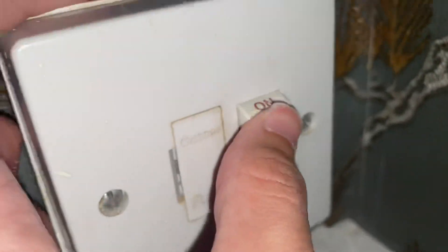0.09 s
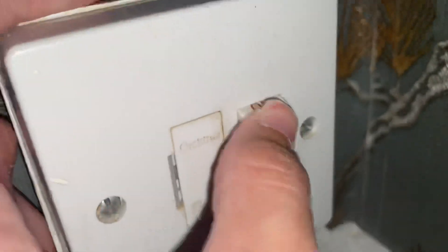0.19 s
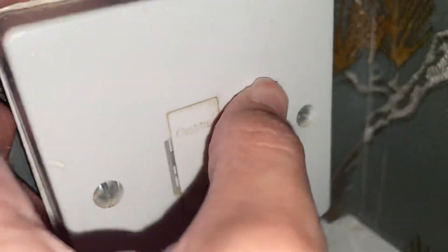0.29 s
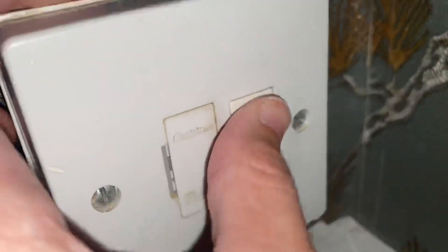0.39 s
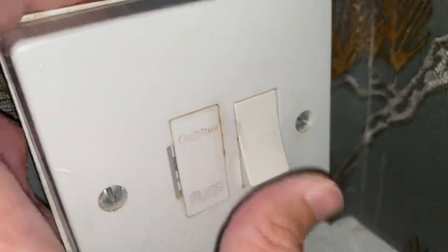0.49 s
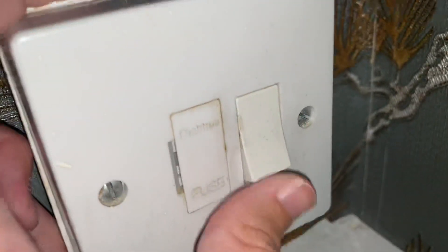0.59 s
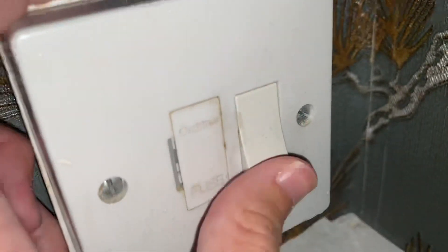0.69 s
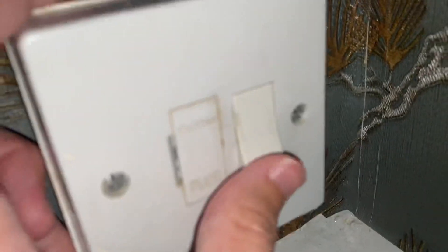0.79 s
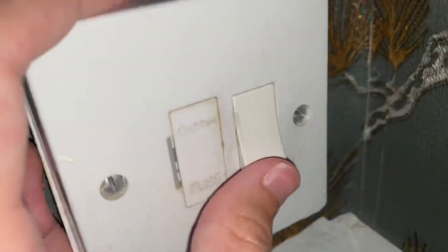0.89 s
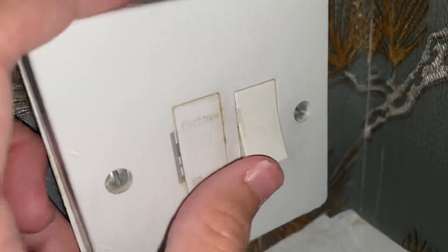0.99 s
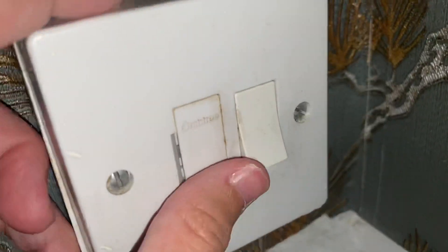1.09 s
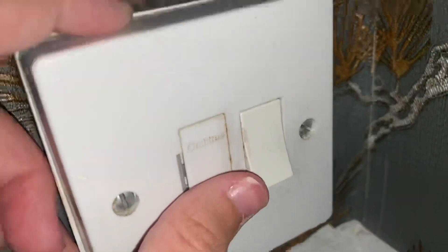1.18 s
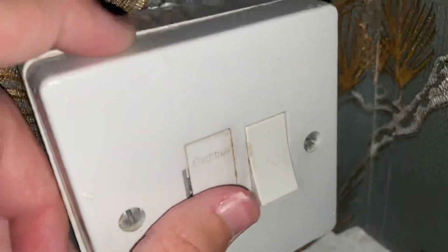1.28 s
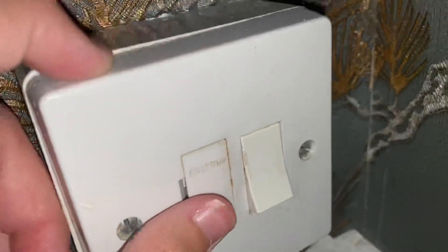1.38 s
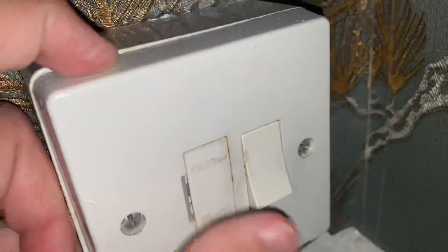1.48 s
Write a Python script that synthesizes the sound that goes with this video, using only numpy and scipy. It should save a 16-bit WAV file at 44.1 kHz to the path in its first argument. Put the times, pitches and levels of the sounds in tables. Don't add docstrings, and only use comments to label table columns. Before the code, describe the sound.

A plastic wall switch is flicked once very close up: a small slip, then a bright hard snap with a hollow knock and brief small-room echo, followed by quiet skin rubbing and soft fingertip taps.

```python
import sys
import numpy as np
from scipy import signal
from scipy.fft import rfft, irfft, next_fast_len
from scipy.io import wavfile
from scipy.ndimage import uniform_filter1d, map_coordinates

SR = 44100
rng = np.random.default_rng(int(sys.argv[2]) if len(sys.argv) > 2 else 0)


def magnitude_from_level(level_db):
    exponent = np.asarray(level_db, float) / 20
    return 10 ** exponent


def dump(signal):
    limited = np.clip(np.atleast_2d(signal).T, -1, 1)
    pcm = np.round(limited * 32767).astype(np.int16)
    wavfile.write(sys.argv[1], SR, pcm)


N = 68355


def unit(x):
    return x / np.sqrt(np.mean(x ** 2) + 1e-20)


def along(points, hz):
    f, v = np.transpose(points)
    return np.interp(np.log(hz + 1), np.log(f + 1), v)


def curve(rows):
    return np.interp(np.arange(N) / SR, *np.transpose(rows))


def wobble(rate):
    return map_coordinates(rng.standard_normal(N // 64), [np.arange(N) * rate / SR])


def filtered(x, response):
    n = x.shape[-1]
    size = next_fast_len(n + 4096)
    return irfft(rfft(x, size) * response(np.fft.rfftfreq(size, 1 / SR)), size)[..., :n]


def rush(source, spectrum):
    # f/Hz, likeness (1 = the same)
    alike = [(60, .85), (130, .85), (290, 0.37), (640, 0.085), (3300, .3), (4100, 0.3), (4900, .2)]

    def response(hz):
        turn = np.arccos(np.clip(along(alike, hz), -1, 1)) / 2
        return magnitude_from_level(along(spectrum, hz)) * [np.cos(turn), np.sin(turn)]

    mid, side = filtered(source, response)
    return unit(np.array([mid + side, mid - side]))


def patchy():
    z = signal.stft(rng.standard_normal((2, N)), nperseg=512)[2]
    field = uniform_filter1d(rng.standard_normal(z.shape[1:]), size=4, axis=0)
    field = uniform_filter1d(field, size=9, axis=1)
    patch_db = 2.5
    return signal.istft(z * magnitude_from_level(patch_db * unit(field)), nperseg=512)[1][:, :N]


def background():
    # f/Hz, level/dB
    air_colour = [(20, -19), (110, -2), (400, -18), (800, -22), (1100, -18), (2300, -25), (3200, -32),
                  (16000, -71)]
    # f/Hz, level/dB, wobble rate/(1/s)
    overtones = [(297.4, -75.5, 24)]
    # t/s, level/dB
    handling = [
        (0, -54),
        (.1, -73),
        (.55, -77),
        (.7, -56),
        (.78, -55.5),
        (.9, -58.5),
        (.98, -60.5),
        (1.08, -81),
        (1.55, -67),
    ]
    # f/Hz, level/dB
    thump_colour = [(15, -29), (35, -12), (60, 6.5), (85, -1.5), (140, -51.5)]
    t = np.arange(N) / SR
    air_db = -63
    air = magnitude_from_level(air_db) * rush(patchy(), air_colour)
    hum = 0
    for hz, db, rate in overtones:
        level = magnitude_from_level(db + 3.5 + 2.1 * wobble(rate))
        hum = hum + level * np.sin(2 * np.pi * hz * t + 0.82 * wobble(rate))
    thump = magnitude_from_level(curve(handling) + 2.5 * wobble(14)) * rush(rng.standard_normal((2, N)), thump_colour)
    return air + hum + thump


def mains():
    # t/s, f/Hz, level/dB
    hum_path = [(0.0, 97.5, -56), (0.03, 98.4, -50), (0.05, 100.8, -62.5), (0.146, 99, -57.5),
                (0.18, 96.8, -54), (0.224, 92.8, -74), (0.262, 94.2, -60), (0.292, 94.6, -77),
                (0.384, 100.6, -85), (0.5, 99.02, -62), (0.862, 101.2, -54.5), (0.958, 101.6, -58.5),
                (1.036, 99.7, -64.5), (1.264, 98.9, -56.5), (1.298, 98.9, -79), (1.32, 98.8, -57),
                (1.48, 99.2, -58), (1.55, 96.2, -55.5)]
    s, hz, db = np.transpose(hum_path)
    phase = 2 * np.pi * np.cumsum(curve(np.c_[s, hz])) / SR
    phase = phase + .3 * wobble(9) * np.array([[1], [-1]])
    return magnitude_from_level(curve(np.c_[s, db]) + 2 + 1.5 * wobble(20)) * np.sin(phase)


def room(x):
    # f/Hz, time/s
    fade_time = [(200, .4), (1300, .5), (2700, .42), (3050, .7), (3500, .42), (12000, .22)]
    # f/Hz, level/dB
    room_colour = [(300, 7), (800, 0), (1300, 5), (2050, 3), (2400, -8), (3050, 0), (3600, -4), (8000, -8),
                   (11000, -10), (14500, -26)]
    early_db, early_t60_s, late_db, wall_delay_s = -23, .14, -27, .014
    hz, t, z = signal.stft(rng.standard_normal((2, 2, SR // 2)), SR, nperseg=256)
    colour = magnitude_from_level(along(room_colour, hz))[:, None]
    early_fade = -60 * t / early_t60_s + 0 * colour
    late_fade = -60 * t / along(fade_time, hz)[:, None]
    early, late = signal.istft(z * colour * magnitude_from_level([[early_fade], [late_fade]]), SR, nperseg=256)[1]
    tail = magnitude_from_level(early_db) * early / np.linalg.norm(early[0])
    tail = tail + magnitude_from_level(late_db) * late / np.linalg.norm(late[0])
    delayed = np.pad(x, ((0, 0), (round(wall_delay_s * SR), 0)))
    return signal.fftconvolve(delayed, tail, axes=1)[:, :N]


def fingers():
    # start t/s, length/s, hiss level/dB, drag level/dB
    strokes = [(0, 0.038, -78, -71), (0.18, 0.09, -72.5, -61.5), (.26, 0.3, -79, -60.5),
               (0.437, 0.16, -70, -66), (0.61, 0.057, -98, -70.5), (0.704, 0.075, -75.5, -73),
               (0.837, 0.024, -80, -90), (0.886, .02, -84.5, -96), (0.956, 0.078, -79, -75),
               (1.012, 0.13, -72, -85), (1.153, 0.11, -71, -75), (1.213, 0.16, -65.5, -69),
               (1.351, 0.064, -78, -75), (1.449, 0.11, -72.5, -72.5)]
    # f/Hz, level/dB
    skin_colour = [(1000, -29.5), (3000, -12.5), (4100, -8), (5200, -11.5), (7200, -3.5), (11000, -6),
                   (14000, -4.5), (16500, -33)]
    # f/Hz, level/dB
    drag_colour = [(400, -16), (1200, -3), (2600, -6), (3150, 3), (3700, -5), (6500, -9), (9000, -30)]
    grains_per_s, grain_db, grain_share = 810, 8.5, .4
    sharpness, rest_db = 0.89, -104
    start, length, hiss_db, drag_db = np.transpose(strokes)[..., None]
    swell = np.sin(np.pi * np.clip((np.arange(N) / SR - start) / length, 0, 1)) ** sharpness
    hiss_noise, drag_noise = patchy(), patchy()
    luck = rng.random((2, N))
    grains = (luck[0] < grains_per_s / SR) * magnitude_from_level(-grain_db * np.log(luck[1] + 0.033)) * np.sign(hiss_noise[0])
    catches = grain_share * unit(grains)
    hiss = rush(hiss_noise + catches, skin_colour)
    drag = rush(drag_noise + catches, drag_colour)
    rubbing = (np.sum(magnitude_from_level(hiss_db) * swell, 0) + magnitude_from_level(rest_db)) * hiss
    rubbing = rubbing + np.sum(magnitude_from_level(drag_db) * swell, 0) * drag
    return magnitude_from_level(1.3 * wobble(20) + 0.3 * wobble(100)) * rubbing


def ring(modes, t, spot_hz=None):
    off_spot_db, scatter_db = 24, 1.5
    hz, db, t60 = np.transpose(modes)[..., None]
    if spot_hz:
        db = db - off_spot_db * abs(np.log2(hz / spot_hz))
    detune, scatter, shift = rng.standard_normal((3, 2, len(modes), 1))
    phase = 2 * np.pi * hz * (1 + .012 * detune) * t + .5 * shift
    tones = magnitude_from_level(db + scatter_db * scatter - 60 * t / t60) * np.sin(phase)
    return np.sum(tones, axis=1) * (1 - np.exp(-t / 0.00022))


def knocks(table, damped=1):
    # f/Hz, level/dB
    crack_colour = [(1500, -23.5), (4000, -5), (7000, -3), (11000, 1), (14000, -8.5), (17000, -29)]
    # f/Hz, level/dB, fade time/s
    rocker = [(1850, -6.5, 0.01), (2400, 0.5, 0.015), (2910, 1.5, 0.0082), (3170, 0.5, .012),
              (4650, -8, 0.016), (4980, -3, 0.0015), (5225, 0, 0.011), (6525, -11, 0.014), (7870, -3, .008),
              (10680, -14, .008), (12700, -15, .008)]
    # f/Hz, level/dB, fade time/s
    box = [(300, -4, .03), (430, -5, .03), (520, -4, .02), (630, -3, .05), (785, -4, .025), (1000, 0, .01),
           (1250, 3, .008), (1600, 6, .008), (2050, 3, .009), (2600, 3, .006), (3900, 2, .009)]
    # f/Hz, left over right/dB
    left_over_right = [(300, 6), (650, -3.5), (1300, -1), (2900, 3), (4000, 1), (5500, -4)]
    crack_s, low_cut_hz = .003, 170
    out = np.zeros((2, N + SR))
    t = np.arange(SR // 8) / SR
    damping = magnitude_from_level(-60 * t * (damped - 1) / 0.01194)
    for s, crack_db, ring_db, box_db, spot_hz in table:
        noise = unit(filtered(rng.standard_normal(len(t)), lambda hz: magnitude_from_level(along(crack_colour, hz))))
        crack = magnitude_from_level(crack_db - 60 * t / crack_s) * noise
        plastic = magnitude_from_level(ring_db - 8) * damping * ring(rocker, t)
        hollow = magnitude_from_level(box_db - 3.5) * ring(box, t, spot_hz)
        start = round(s * SR)
        out[:, start:start + len(t)] += crack + plastic + hollow

    def placed(hz):
        lean = magnitude_from_level(along(left_over_right, hz) / 2 * np.array([[1], [-1]]))
        return lean * (1j * hz / (low_cut_hz + 1j * hz)) ** 2

    return filtered(out[:, :N], placed)


def finger_taps():
    # t/s, crack level/dB, ring level/dB, box level/dB, struck spot f/Hz
    taps = [(.005, -55, -87, -44.5, 630), (.009, -80, -77, -51, 3900), (.115, -80, -95, -49, 430),
            (.680, -88, -59, -61, 630), (.699, -90, -86.5, -49, 630), (.8158, -56, -53, -75, 3900),
            (.8172, -56, -60.5, -56, 3900), (.821, -84, -77, -54, 630), (.9716, -66, -60.5, -50, 2600),
            (.9732, -78.5, -75, -47, 520), (.9822, -60, -55, -38, 1000), (.9828, -67, -53, -48.5, 2080),
            (.9840, -84, -75, -44.5, 478.7), (1.0118, -81.5, -64, -49.5, 1250),
            (1.0130, -85, -80, -56, 785), (1.165, -69, -72, -57.5, 630), (1.2, -89.5, -77, -61, 2050),
            (1.211, -77, -68, -47, 630), (1.233, -59, -75, -49, 630), (1.235, -79.5, -72, -41, 1910),
            (1.24, -80, -78, -48, 1794), (1.315, -65, -64, -48, 600), (1.467, -55.5, -60, -56.5, 1250)]
    return knocks(taps, damped=2.5)


def switch_snap():
    # t/s, crack level/dB, ring level/dB, box level/dB, struck spot f/Hz
    contacts = [(.2203, -33, -36, -30, 3910), (.2215, -45, -40, -27, 1300), (.2228, -48, -43.5, -28, 1800),
                (.2218, -68.5, -59, -28.5, 600), (.2240, -61.5, -50, -35.5, 1100),
                (.2392, -58.5, -38, -37.5, 3950), (.2405, -48.5, -32.5, -42, 785),
                (.2418, -52, -25, -30.5, 2580), (.2428, -58.5, -26, -22.5, 3830),
                (.2447, -59.5, -30, -30.5, 1250), (.2465, -60, -30.5, -30.5, 800),
                (.2503, -0.5, -13, -26, 3900), (.2508, -11.5, -11.5, -18.5, 2490),
                (.2513, -12.5, -3.5, -19, 1600), (.2526, -20.5, -14, -22, 851),
                (.2531, -15.5, -14, -16, 3890), (.2540, -17, -17.5, -21.5, 1590),
                (.2558, -26, -25.5, -26.5, 300), (.2575, -30.5, -32.5, -29, 1600),
                (.2652, -48, -33.5, -31, 2050), (.2685, -50, -32.5, -37.5, 427.1),
                (.2745, -43.5, -32.5, -29.5, 1253)]
    return knocks(contacts)


def scene():
    duck_s, duck_db, hold_s, back_s = .262, -4, .12, .16
    duck = curve([(0, 0), (duck_s - .004, 0), (duck_s, duck_db), (duck_s + hold_s, duck_db * .8),
                  (duck_s + hold_s + back_s, 0), (N / SR, 0)])
    near = switch_snap() + finger_taps()
    return magnitude_from_level(duck) * background() + mains() + fingers() + near + room(near)


def roll_off(x):
    return signal.sosfilt(signal.butter(12, 16660, fs=SR, output="sos"), x)


def record(dry):
    # f/Hz, phase/rad
    smear_depth = [(1200, 0), (2200, 1.2), (3300, 1.2), (4100, .3), (5500, .5)]
    # f/Hz, phase/rad
    right_leads = [(130, 0), (280, .9), (650, .8), (1100, 2.2), (2800, 2.8), (3900, .3)]
    wide_hz, lag_s, in_phase_hz = 6100, 1 / 4100, 6900
    smear_hz, top_hz, full_scale = 130, 15900, .86
    knots = rng.standard_normal(400)

    def high(hz):
        return np.clip((hz - wide_hz) / 500 + .5, 0, 1)

    def treble_response(hz):
        half_lag = np.exp(1j * np.pi * lag_s * (hz - in_phase_hz))
        top = np.clip(1 - (hz - top_hz) / 700, 0, 1) ** 2
        return high(hz) * top * np.array([1 / half_lag, half_lag])

    def body_response(hz):
        random_phase = along(smear_depth, hz) * map_coordinates(knots, [hz / smear_hz])
        right = np.exp(1j * (random_phase + along(right_leads, hz)))
        return (1 - high(hz)) * np.array([1 + 0 * hz, right])

    treble = filtered(dry[0], treble_response)
    body = filtered(dry, body_response)
    return roll_off(np.clip(body + treble, -full_scale, full_scale))


dry = scene()
out = record(dry)
dump(out)
```